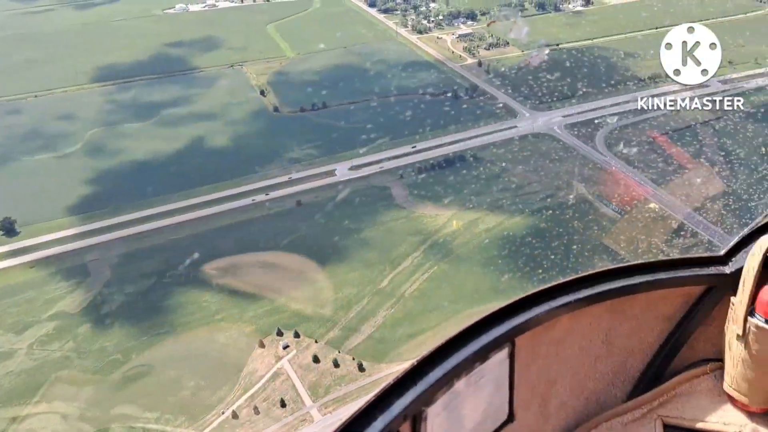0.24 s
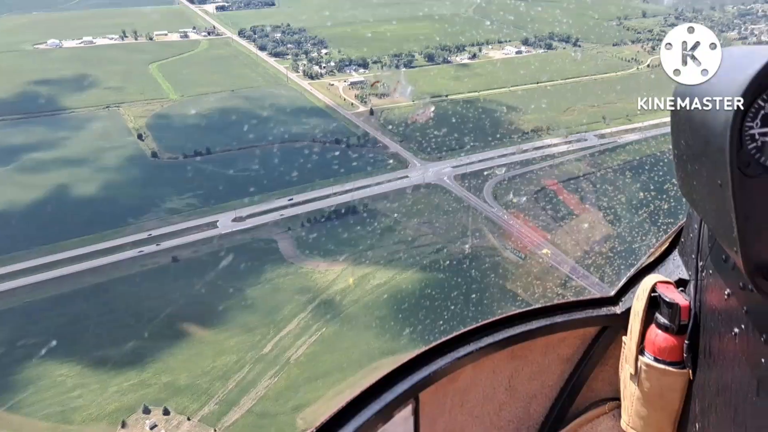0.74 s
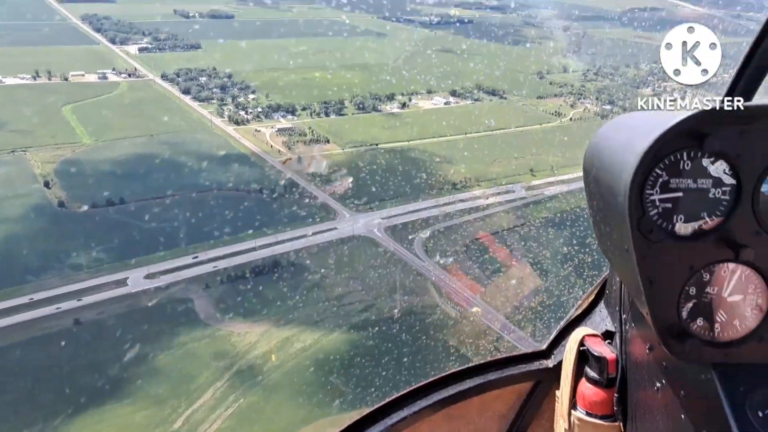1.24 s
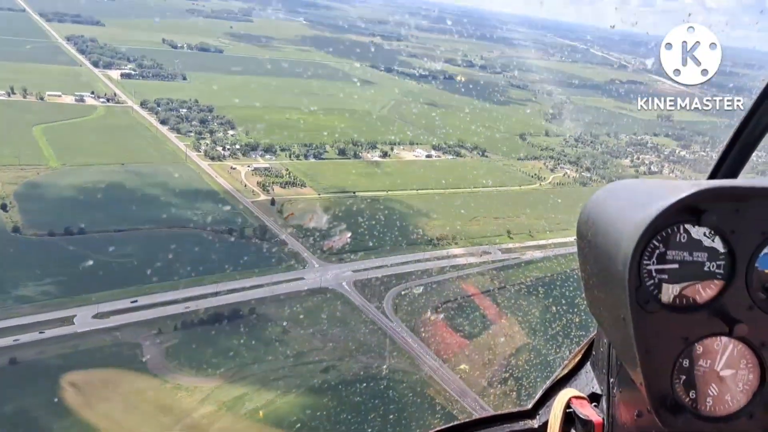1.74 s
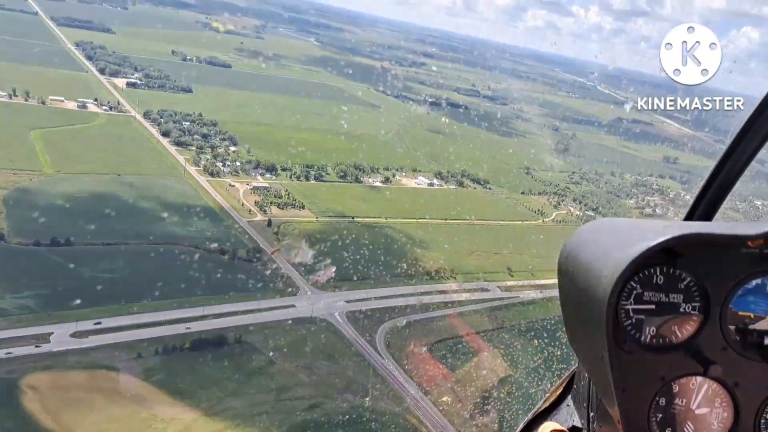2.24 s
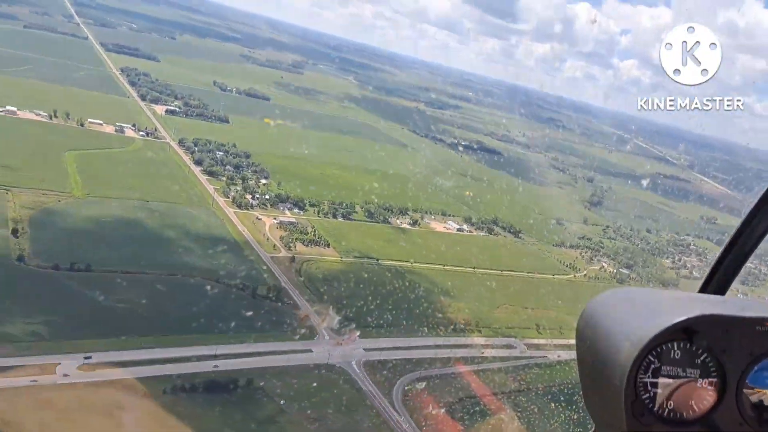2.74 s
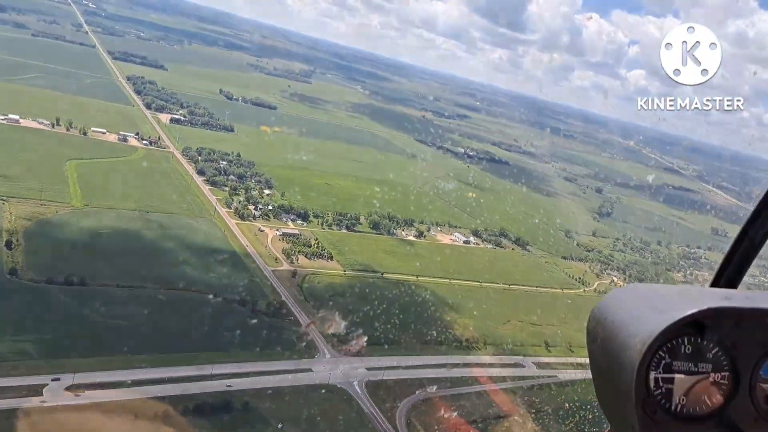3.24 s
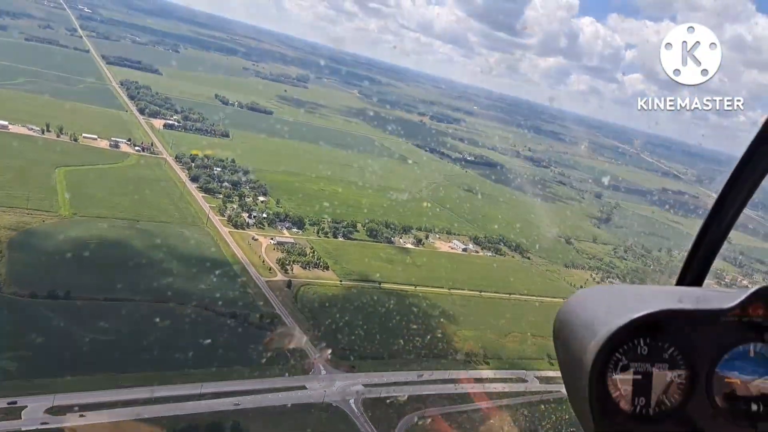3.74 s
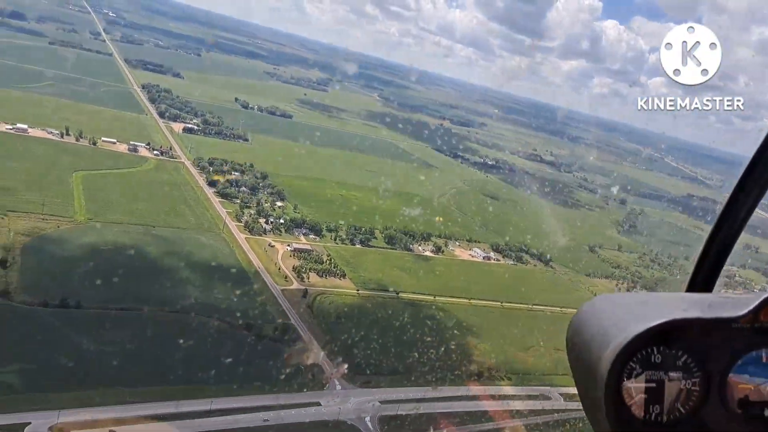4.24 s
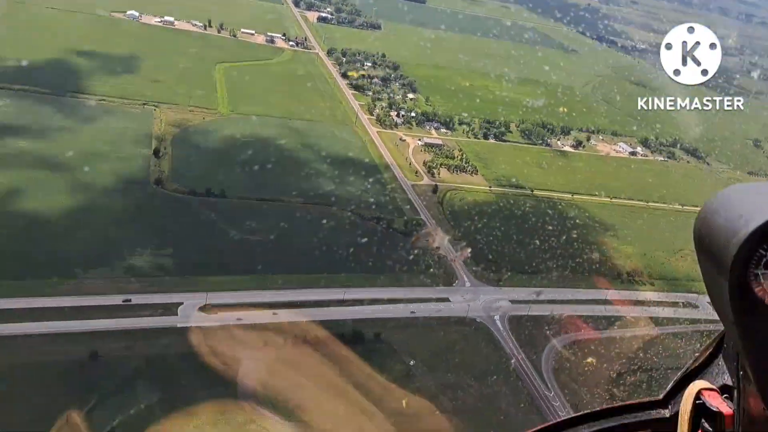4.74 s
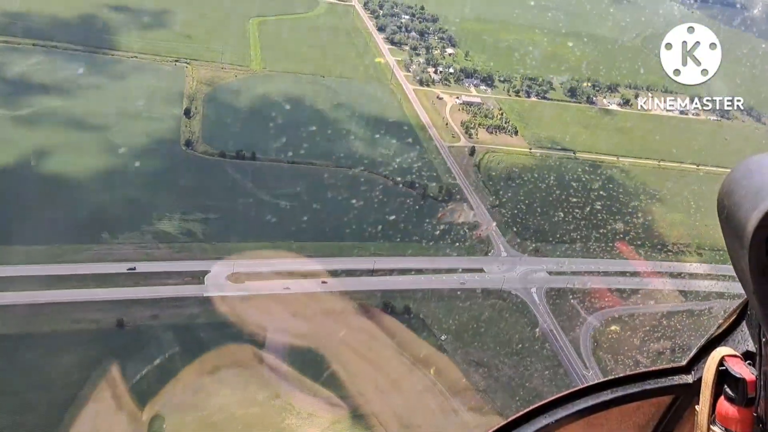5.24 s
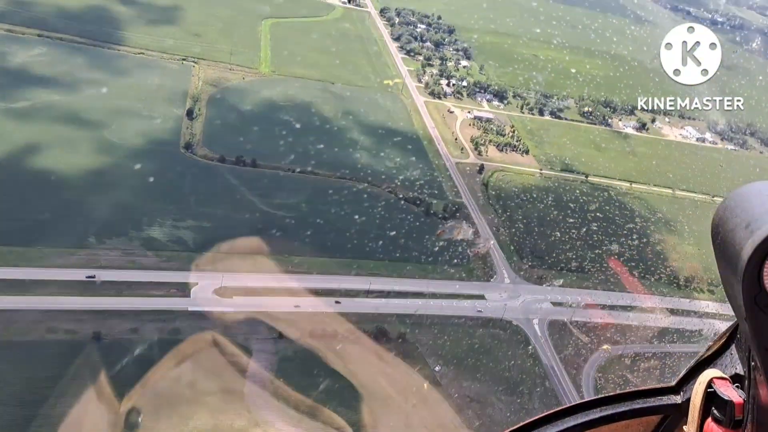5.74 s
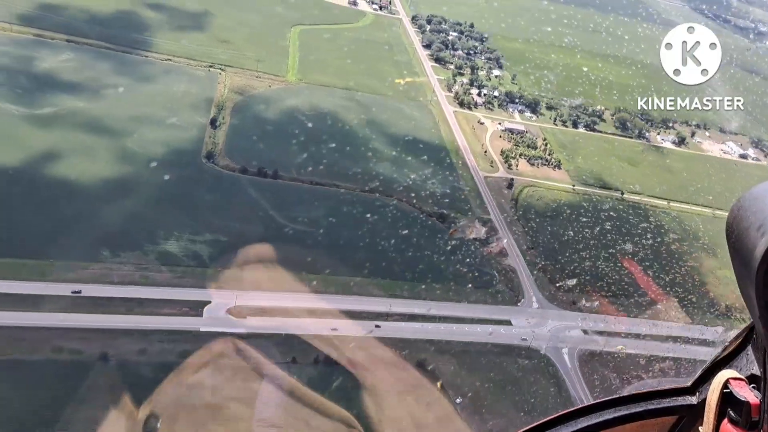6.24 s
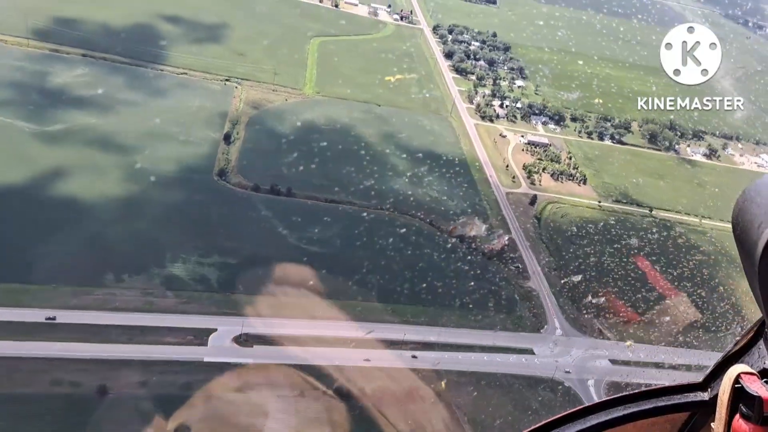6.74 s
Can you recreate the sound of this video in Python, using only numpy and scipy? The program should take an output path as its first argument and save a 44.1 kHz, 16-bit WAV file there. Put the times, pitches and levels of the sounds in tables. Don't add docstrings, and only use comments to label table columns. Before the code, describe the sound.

Inside a small helicopter cruising above fields, the piston engine, rotors and gearbox hum as one dense, steady low drone. Deep boom and panel roar shake the cabin. Air hisses at the door gaps, puffing about fourteen times a second with the blades. A thin high whistle flickers briefly near two seconds and more softly later. The close hand-held stereo microphone is moving, so tones swell and fade; the right side is duller.

```python
import sys
import numpy as np
from scipy import signal
from scipy.fft import rfft, irfft
from scipy.io import wavfile
from scipy.ndimage import uniform_filter1d

SR = 44100
rng = np.random.default_rng(int(sys.argv[2]) if len(sys.argv) > 2 else 0)


def output_pcm(signal):
    pcm = np.clip(np.atleast_2d(signal).T, -1, 1) * 32767
    wavfile.write(sys.argv[1], SR, np.round(pcm).astype(np.int16))


def undo_db(level):
    steps = np.asarray(level, float) / 20
    return 10 ** steps


N = 308700

CYCLE_HZ, BLADE_HZ, TAIL_HZ, MESH_HZ = 22.75, 13.607, 40.465, 387.55
BLADE_OVERHEAD_S = 0.056

# (multiple [1], level [dB], left minus right [dB])
ENGINE_ORDERS = [(2, -41, 1), (3, -30.6, 0), (5, -36, .7), (7, -29, 1), (8, -39.5, 2), (11, -35.5, -2),
                 (13, -38, -1.5), (14, -42, -4), (18, -42, -2), (21, -46, 4), (31, -45, -8), (32, -44, -10)]
# (multiple [1], level [dB], left minus right [dB])
ROTOR_ORDERS = [(1, -63.2, 2.4), (2, -53, 3.1), (4, -28.5, -1.5), (8, -41, -1), (11, -37, 7)]
# (multiple [1], level [dB], left minus right [dB])
TAIL_ORDERS = [(1, -39, 0), (2, -27.5, -.7), (8, -37, -.2)]
# (multiple [1], level [dB], left minus right [dB])
GEAR_ORDERS = [(2, -52, -2), (3, -56, 3), (4, -56, -5)]
# (tone [Hz], direct level [dB], echo share [0-1], loudest place [m], wall direction [deg])
STANDING_WAVES = [
    (136.5, -21.7, 0.95, 0.889, -0.0),
    (161.86, -21.6, 0.68, 0.562, -125.2),
    (273.0, -23.9, 0.95, 0.258, 106.1),
    (387.55, -25.5, 0.95, 0.197, 97.3),
    (1092.0, -40.8, 0.95, 0.086, 2.5),
    (1092.0, -35.2, 0.73, 0.064, 28.2),
    (204.75, -25.5, 0.87, 0.369, 163.6),
]
# (time [s], forward [m], sideways [m])
HAND_PATH = [(0.0, 0.0, 0.0), (0.6, -0.02, 0.002), (1.2, -0.026, -0.029), (1.8, -0.006, -0.037),
             (2.4, -0.039, -0.046), (3.2, -0.012, -0.061), (3.8, 0.088, -0.042), (4.4, 0.13, -0.062),
             (5.0, 0.156, -0.033), (5.6, 0.177, -0.059), (6.3, 0.167, 0.052), (7.0, 0.17, 0.023)]

# (frequency [Hz], level [dB per Hz])
BOOM_COLOUR = [(15, -68), (28, -66), (35, -55), (44, -41.5), (52, -45), (62, -37.5), (76, -45), (90, -51),
               (102, -46), (138, -36.5), (150, -38.5), (172, -40.5), (225, -42), (290, -44)]
# (frequency [Hz], level [dB per Hz])
ROAR_LEFT_COLOUR = [(265, -43.5), (290, -42.6), (310, -46.2), (400, -48), (470, -49), (530, -52),
                    (570, -48.7), (620, -52.5), (790, -55.5), (1100, -55.6), (1250, -58.5), (1450, -61.8),
                    (1800, -63.5)]
# (frequency [Hz], level [dB per Hz])
ROAR_RIGHT_COLOUR = [(285, -42), (310, -45.8), (395, -46.1), (430, -50.4), (570, -48.3), (640, -46.3),
                     (725, -45.8), (790, -54.6), (860, -56.6), (960, -50.5), (1080, -53), (1150, -57.5),
                     (1420, -61.5), (1650, -67.5)]
# (frequency [Hz], level [dB per Hz])
HISS_LEFT_COLOUR = [(1600, -62.5), (2050, -63), (2250, -65.5), (2750, -65), (3200, -66), (4000, -68.5),
                    (5650, -67), (6000, -68.5), (6600, -76.5), (7200, -78.5), (9200, -77.5), (10400, -74.5),
                    (12000, -73.5), (15500, -78)]
# (frequency [Hz], level [dB per Hz])
HISS_RIGHT_COLOUR = [(1600, -64.5), (1850, -65.5), (2150, -68), (2700, -68.5), (3300, -76), (5100, -79.5),
                     (5600, -95), (7000, -99), (8500, -107), (9600, -92), (12400, -87.5), (14200, -100),
                     (15500, -106)]
# (frequency [Hz], share [0-1])
BLADE_PUFF_SHARE = [(1500, 0.13), (4500, 0.07), (6000, 0.15), (7000, 0.4), (8200, 0.3), (8900, 0),
                    (10000, 0.1), (11500, 0.32), (12500, 0.34), (14000, 0.24), (15300, .1)]
# (frequency [Hz], delay [s])
SWISH_DELAY = [(3500, -.006), (5500, .001), (8000, 0), (9300, .007), (10800, .003), (12200, .001),
               (14000, 0)]
# (frequency [Hz], likeness [0-1])
MICROPHONE_LIKENESS = [(30, .93), (50, 0.96), (150, 1), (400, 0.86), (480, 0.17), (530, 0.38), (620, 0.55),
                       (720, 0.57), (860, 1), (930, 0.49), (1020, 0.18), (1100, 0.6), (1800, 0.07),
                       (4000, 0.01)]
# (frequency [Hz], lead [rad])
LEFT_LEAD = [(40, -.45), (70, 0.43), (120, -0.06), (240, 0.34), (400, 0.64), (500, 0.03), (800, 2),
             (930, 1), (1100, 4), (2000, 6)]
# (time [s], half length [s], gain [dB])
GUSTS_ON_CABIN = [
    (.95, 0.093, 4),
    (2.2, 0.11, 5),
    (3.3, .06, 4),
    (6.72, 0.073, 4),
]
# (time [s], half length [s], gain [dB])
TIP_ALIGNED = [
    (2.03, .27, 11),
    (5.5, .45, 6),
]


def fft_hz():
    return np.maximum(np.arange(N // 2 + 1) * SR / N, 1)


def on_log_hz(table, hz):
    points = np.array(table, float)
    return np.interp(np.log(hz), np.log(points[:, 0]), points[:, 1])


def walk(rate_hz):
    hold = int(SR / rate_hz / 64)
    coarse = np.repeat(rng.standard_normal(N // 64 // hold + 2), hold)
    coarse = uniform_filter1d(uniform_filter1d(coarse, hold), hold)
    coarse = (coarse - coarse.mean()) / coarse.std()
    return np.interp(np.arange(N) / 64, np.arange(len(coarse)), coarse)


def curves(table):
    s, *columns = np.transpose(table)
    return [np.interp(np.arange(N) / SR, s, column) for column in columns]


def swells(table):
    t = np.arange(N) / SR
    return sum(db * np.exp(-.5 * ((t - s) / half) ** 2) for s, half, db in table)


def noise(left, right, low_hz, high_hz, share=1, source=1):
    hz = fft_hz()
    common, own = rfft(rng.standard_normal((2, N)) * source)
    alike = np.clip(on_log_hz(MICROPHONE_LIKENESS, hz), 0, 1)
    lag = np.exp(-1j * on_log_hz(LEFT_LEAD, hz))
    other = alike * common * lag + np.sqrt(1 - alike ** 2) * own
    edges = share / (1 + (low_hz / hz) ** 12) / (1 + (hz / high_hz) ** 12)
    colour = undo_db(np.array([on_log_hz(left, hz), on_log_hz(right, hz)]))
    return irfft(np.array([common, other]) * colour * np.sqrt(edges * SR / 2), N)


def standing(wave, forward, sideways):
    tone_hz, direct_db, echo, loudest_m, wall_deg = wave
    wall = np.radians(wall_deg)
    along = forward * np.cos(wall) + sideways * np.sin(wall)
    turn = np.exp(4j * np.pi * tone_hz / 343 * (along - loudest_m))
    return direct_db + 20 * np.log10(np.abs(1 + np.clip(echo, 0, .95) * turn))


def hum(rate_hz, orders, turning, unsteady_db=1.3):
    step = 8
    sides = np.array([[.5], [-.5]])

    def coarse(value):
        return np.broadcast_to(value, N)[::step]

    out = 0
    for multiple, level_db, pan_db in orders:
        angle = 2 * np.pi * (multiple * rate_hz * coarse(turning) + rng.random())
        gain = undo_db(coarse(level_db + unsteady_db * walk(7)) + coarse(pan_db) * sides)
        lead = on_log_hz(LEFT_LEAD, multiple * rate_hz) * sides
        out = out + np.sqrt(2) * gain * np.sin(angle + lead)
    return signal.resample_poly(out, step, 1, axis=1, padtype="line")[:, :N]


def machinery(firing_db, tail_db, twice_db, mesh_db, fan_left_db, fan_right_db, ninth_db):
    turning = np.cumsum(1 + .0007 * walk(1.5) + .0009 * walk(9)) / SR
    fan = (48, (fan_left_db + fan_right_db) / 2, fan_left_db - fan_right_db)
    moving_orders = [(6, firing_db, .9), (9, ninth_db, .2), (12, twice_db, -2.1), fan]
    engine = hum(CYCLE_HZ, ENGINE_ORDERS + moving_orders, turning)
    main_rotor = hum(BLADE_HZ, ROTOR_ORDERS, turning)
    tail_rotor = hum(TAIL_HZ, TAIL_ORDERS + [(4, tail_db, -.6)], turning)
    gearbox = hum(MESH_HZ, GEAR_ORDERS + [(1, mesh_db, -.6)], turning, unsteady_db=2.5)
    return engine + main_rotor + tail_rotor + gearbox


def cabin(upper_db, roar_db, bright_db):
    boom = BOOM_COLOUR, BOOM_COLOUR
    panels = ROAR_LEFT_COLOUR, ROAR_RIGHT_COLOUR
    deep = noise(*boom, 5, 165) * undo_db(swells(GUSTS_ON_CABIN) - .6 + .5 * walk(2))
    middle = noise(*boom, 165, 270) * undo_db(upper_db / 2 + .8 * walk(3))
    upper = noise(*panels, 270, 420) * undo_db(upper_db + .6 * walk(2))
    roar = noise(*panels, 420, 830) * undo_db(roar_db + .5 * walk(3))
    bright = noise(*panels, 830, 1650) * undo_db(bright_db + .4 * walk(3))
    return deep + middle + upper + roar + bright


def blade_passes():
    passes = (np.arange(N) / SR - BLADE_OVERHEAD_S) * BLADE_HZ + 1.5
    return (passes % 1 - .5) / BLADE_HZ, passes.astype(int)


def dispersed(x):
    turn = 2 * np.pi * np.cumsum(on_log_hz(SWISH_DELAY, fft_hz())) * SR / N
    return irfft(rfft(x) * np.exp(-1j * turn), N)


def slipstream(hiss_db):
    rise_s, fall_s, scatter_db, grit_db = .009, .014, .7, 1.6
    since, number = blade_passes()
    strength = undo_db(scatter_db * rng.standard_normal(128))[number]
    strength = strength * undo_db(1.8 * (1 - number % 2))
    swish = strength * np.exp(-.5 * (since / np.where(since < 0, rise_s, fall_s)) ** 2)
    eddies = np.repeat(rng.standard_normal(N // 32 + 1), 32)[:N]
    swish = swish * undo_db(grit_db * eddies)
    swish = swish / np.sqrt(np.mean(swish ** 2))
    share = np.clip(on_log_hz(BLADE_PUFF_SHARE, fft_hz()), 0, 1)
    hiss = HISS_LEFT_COLOUR, HISS_RIGHT_COLOUR
    steady = noise(*hiss, 1650, SR, 1 - share) * undo_db(.3 * walk(6))
    puffs = dispersed(noise(*hiss, 2000, SR, share, swish))
    return undo_db(hiss_db) * (steady + puffs)


def reflections(x):
    ripple_db, from_hz = 1.45, 550
    hz, _, z = signal.stft(x, SR, nperseg=1024)
    depth_db = ripple_db * np.clip(hz / from_hz - .5, 0, 1)[:, None]
    field = uniform_filter1d(rng.standard_normal(z.shape), 2, axis=1)
    field = uniform_filter1d(field, 30, axis=2)
    return signal.istft(z * undo_db(depth_db * field / field.std()))[1][:, :N]


def whistle():
    top_hz, drop_hz, early_s, length_s = 8170, 500, .004, .0037
    level_db, scatter_db, right_db = -47.5, 2.5, -28
    since, number = blade_passes()
    pitch_chance, level_chance = rng.standard_normal((128, 2))[number].T
    hz = top_hz * (1 + .004 * pitch_chance) - drop_hz / (1 + np.exp(-(since - .004) / .0041))
    level = undo_db(level_db + swells(TIP_ALIGNED) + scatter_db * level_chance)
    envelope = np.exp(-.5 * ((since + early_s) / length_s) ** 2)
    chirp = level * envelope * np.sin(2 * np.pi * np.cumsum(hz) / SR)
    return chirp * undo_db(np.array([[0], [right_db]]))


def scene():
    forward, sideways = curves(HAND_PATH)
    lines = machinery(*[standing(wave, forward, sideways) for wave in STANDING_WAVES])
    upper_db = -.6 + 17 * forward
    roar_db = .5 - 5.5 * forward
    shade_db = -2 * np.exp(-np.arange(N) / SR / .42)
    air = cabin(upper_db, roar_db, .16 + shade_db) + slipstream(-.5 + shade_db)
    return lines + reflections(air) + whistle()


def low_pass(x):
    return signal.sosfilt(signal.butter(12, 15390, fs=SR, output="sos"), x)


def record(dry):
    rounded = np.tanh(.55 * dry) / .55
    hz, _, z = signal.stft(rounded, SR, nperseg=2048)
    lost_hz = [2500, 4950, 8000, 10500, 12500, 14500]
    dropped = np.interp(hz, lost_hz, [0, .3, .9, .2, .25, .7])[:, None]
    chance = rng.random((len(hz) // 8 + 1, z.shape[2])).repeat(8, axis=0)[:len(hz)]
    kept = chance > dropped
    z[1] *= kept / np.sqrt(1 - np.clip(dropped, 0, .9))
    mix = signal.istft(z)[1][:, :N]
    return low_pass(mix)


dry = scene()
out = record(dry)
output_pcm(out)
```